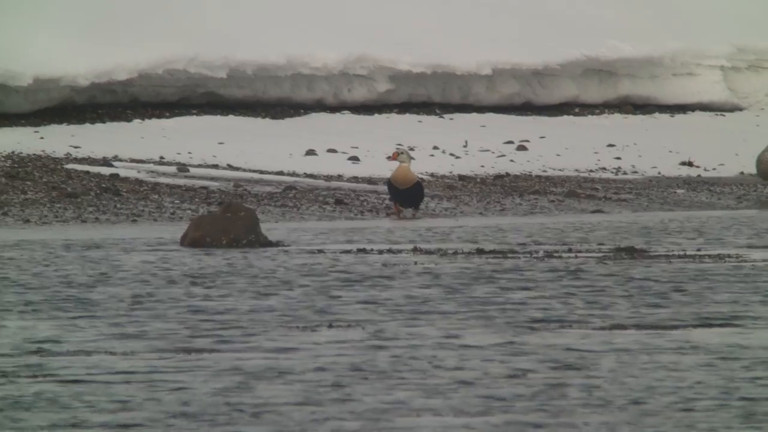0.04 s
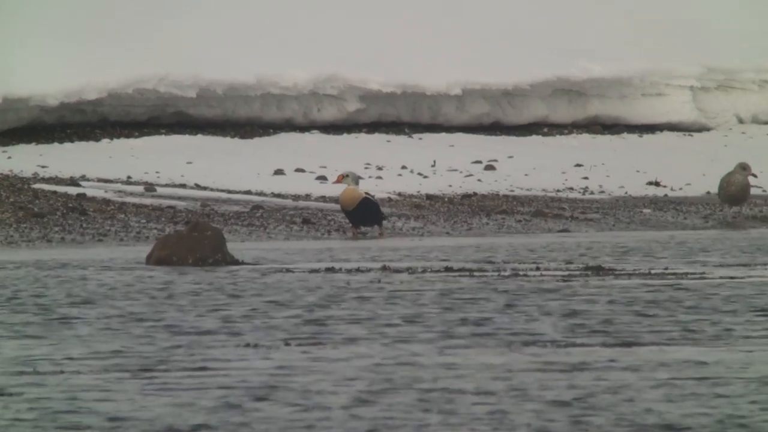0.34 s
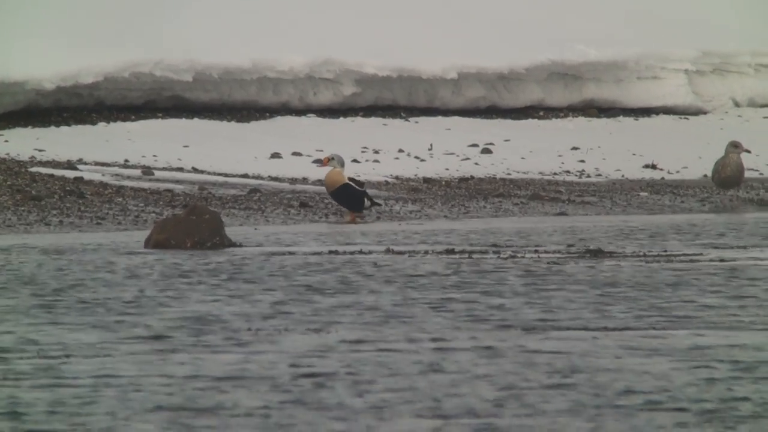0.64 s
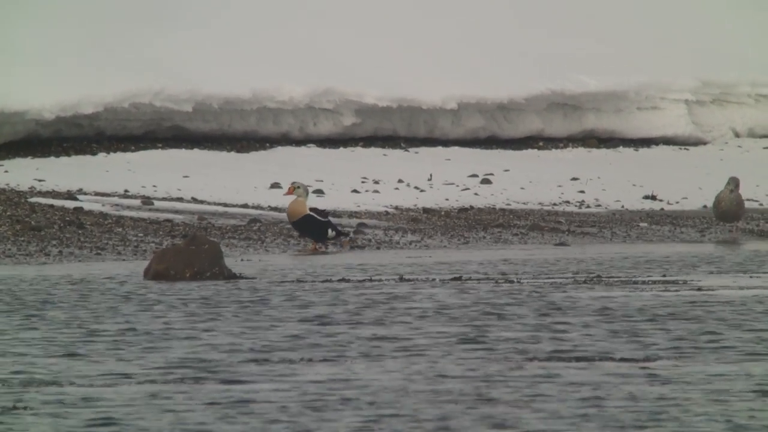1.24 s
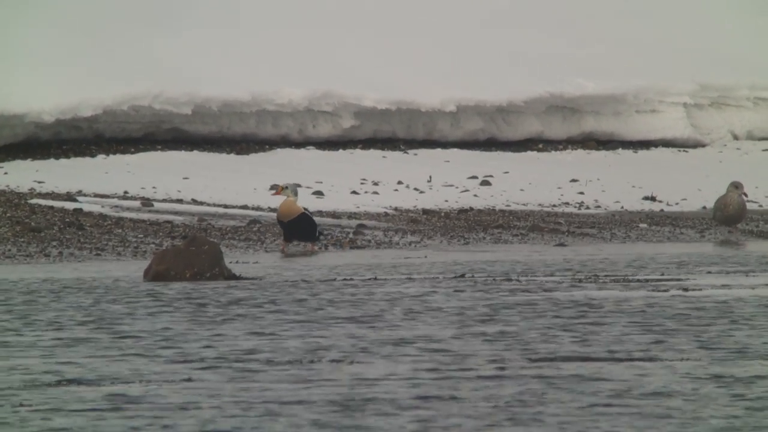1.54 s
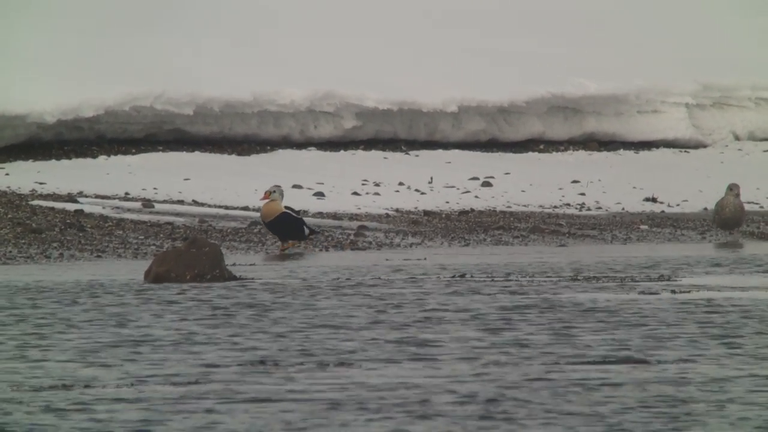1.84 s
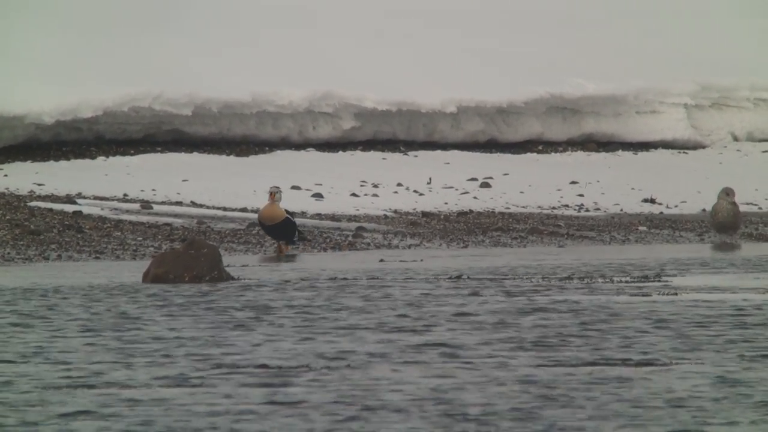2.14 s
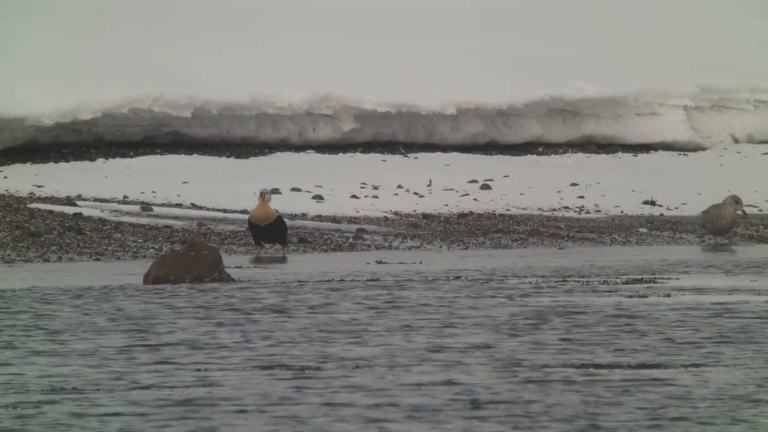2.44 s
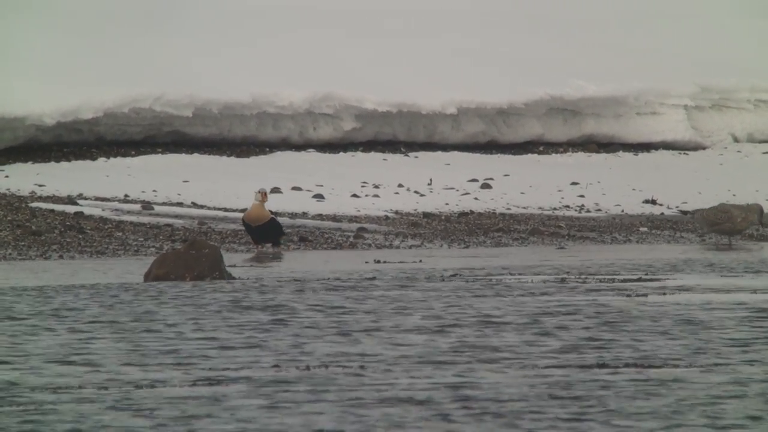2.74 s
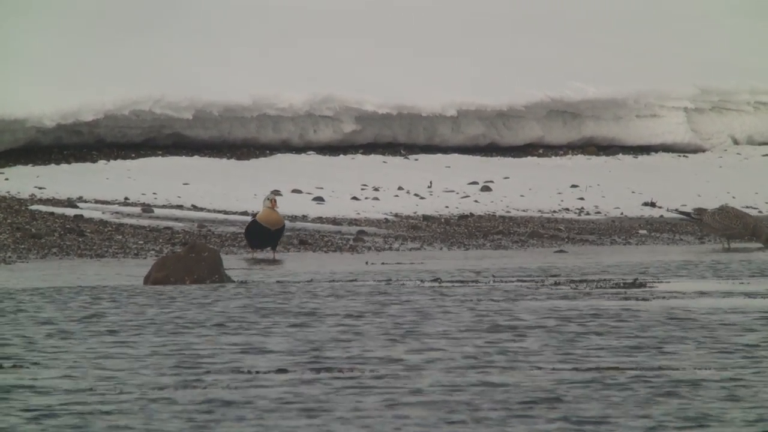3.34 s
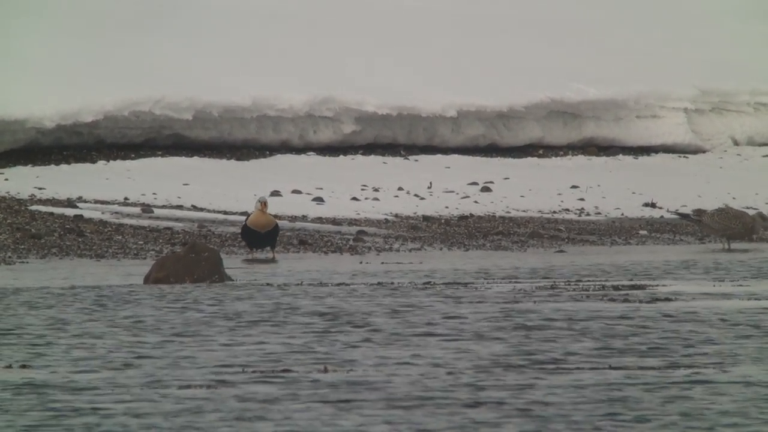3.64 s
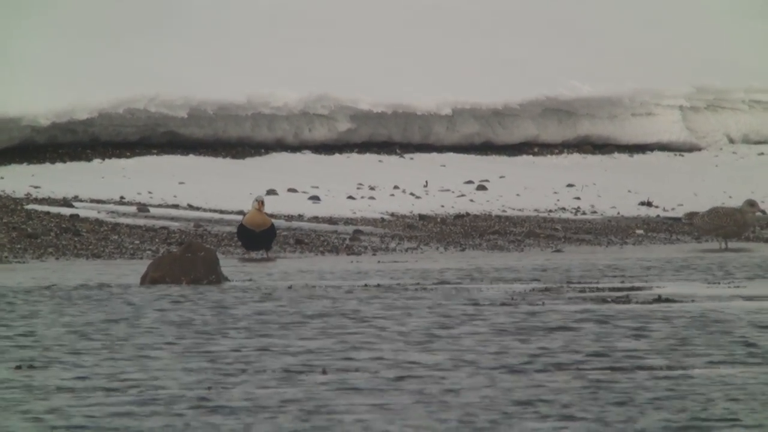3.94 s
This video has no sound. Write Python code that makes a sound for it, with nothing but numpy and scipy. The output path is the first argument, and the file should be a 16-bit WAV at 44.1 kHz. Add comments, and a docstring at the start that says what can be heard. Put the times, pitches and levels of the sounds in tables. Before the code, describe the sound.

Wind blows across the microphone at the water's edge, light at first, then in stronger, fluttering gusts over a low rumble. Far-off sea birds call softly near the start, and wavelets barely sound on the shingle.

```python
"""Wind buffets a microphone: a blustering body, a spitting flutter of small eddies, a low rumble.
A light breeze gives way to gusts after a second; the air drives eddies across the microphone's ports.
Behind it, on a pebbly, snowy shore, wavelets wash over shingle, with tiny ticks and one splash,
and open water murmurs. Distant sea birds whistle, one trills, and a snow bank echoes them."""
import sys
import numpy as np
from scipy import signal
from scipy.fft import rfft, irfft
from scipy.io import wavfile
from scipy.ndimage import uniform_filter1d

SR = 44100
rng = np.random.default_rng(int(sys.argv[2]) if len(sys.argv) > 2 else 0)


def digitize_waveform(pressure):
    """Quantize a signal to 16-bit integers and store it at the path in sys.argv[1].

    Rows of a 2-D input are taken as channels; values are limited to [-1, 1].
    """
    field = np.atleast_2d(pressure).T
    bounded = np.clip(field, -1, 1)
    quanta = np.round(bounded * 32767).astype(np.int16)
    wavfile.write(sys.argv[1], SR, quanta)


N = 176400
T = np.arange(N) / SR


def from_db(db):
    """Decibels to gain."""
    return 10 ** (np.asarray(db) / 20)


def unit_rms(x):
    """Scale to rms 1."""
    return x / np.sqrt(np.mean(x ** 2) + 1e-20)


def curves(rows):
    """Interpolate each column after time_s to every sample."""
    time_s, *columns = np.transpose(rows)
    return [np.interp(T, time_s, column) for column in columns]


def pan(left_over_right_db):
    """Left and right gains."""
    return from_db(np.array([[left_over_right_db / 2], [-left_over_right_db / 2]]))


def delayed(x, delay_s):
    """Fractional delay."""
    return np.interp(T - delay_s, T, x, left=0)


def drift(rate_hz):
    """Smooth random wander, rms 1."""
    hop, settle = 40, 2000
    pole = np.exp(-2 * np.pi * rate_hz * hop / SR)
    noise = rng.standard_normal(N // hop + settle + 2)
    slow = signal.lfilter([1], [1, -2 * pole, pole * pole], noise)[settle:]
    return np.interp(np.arange(N) / hop, np.arange(len(slow)), unit_rms(slow))


def coloured(x, spectrum):
    """Filter by (freq_hz, gain_db) rows, rolling off past both ends; rms 1."""
    hz, db = np.transpose(spectrum)
    bins_hz = np.fft.rfftfreq(2 * N, 1 / SR) + 1
    skirts = 1 / np.sqrt((1 + (hz[0] / 2 / bins_hz) ** 4) * (1 + (bins_hz / 2 / hz[-1]) ** 6))
    gain = from_db(np.interp(np.log(bins_hz), np.log(hz), db))
    return unit_rms(irfft(rfft(x, 2 * N) * skirts * gain)[..., :N])


def stereo_noise(side_db):
    """Mid/side white noise."""
    mid, side = rng.standard_normal((2, N))
    return mid + from_db(side_db) * side * np.array([[1], [-1]])


def clicks(per_s, spread_db):
    """Random impulses, mostly small, a few large; rms 1."""
    sizes = from_db(spread_db * np.minimum(rng.exponential(1, N), 4)) * rng.choice([-1, 1], N)
    return unit_rms(sizes * (rng.random(N) < per_s / SR))


def levelled(x, span_s):
    """Hold short-term stereo rms near 1."""
    size = int(span_s * SR)
    power = uniform_filter1d(uniform_filter1d(np.mean(x ** 2, axis=0), size), size)
    return x / np.sqrt(np.maximum(power, 0) + 1e-4)


def pulses(starts_s, levels_db, decay_s, attack_s=0.0012):
    """Summed envelopes: linear attack, exponential decay."""
    return sum(from_db(db) * np.clip((T - s) / attack_s, 0, 1) * np.exp(-np.abs(T - s) / decay_s)
               for s, db in zip(starts_s, levels_db))


# Open-water spectrum: freq_hz, gain_db
SEA_SPECTRUM = [(100, 10.5), (500, -2), (1700, 3), (2500, -9), (12000, -37)]

def sea(level_db=-56, slope_db_per_s=-2.5):
    """Far murmur of open water, slowly fading."""
    murmur = coloured(stereo_noise(side_db=-8), SEA_SPECTRUM)
    return murmur * from_db(level_db + slope_db_per_s * T + drift(2.4))


# Wavelet envelope: time_s, level_db
WAVELETS = [(0.1, -65.5), (0.86, -67.5), (1.13, -53), (1.23, -70), (1.48, -62.5), (1.86, -72.5),
            (1.96, -60.5), (2.04, -59.5), (2.17, -52), (2.38, -66), (2.75, -75.5), (3.23, -62),
            (3.32, -76.5), (3.87, -72.5), (4.0, -57)]
# Shingle spectrum: freq_hz, gain_db
SHINGLE_SPECTRUM = [(1500, 6.5), (3600, 2), (8000, -1.5), (11000, 2.5), (15500, 0)]

def wash(gain_db=5):
    """Wavelets run over shingle: hiss plus grit."""
    level_db, = curves(WAVELETS)
    grit = np.array([clicks(per_s=930, spread_db=12) for _ in range(2)])
    hiss = coloured(stereo_noise(side_db=0.5) + 0.36 * grit, SHINGLE_SPECTRUM)
    return hiss * from_db(level_db + gain_db + 2.2 * drift(21)) * pan(3)


# Splash spectrum: freq_hz, gain_db
SPLASH_SPECTRUM = [(1100, -18), (2100, -2), (4000, -22.5)]

def splash(centre_s=1.04, width_s=0.028, level_db=-42.5):
    """One brief splash at the water's edge."""
    envelope = from_db(level_db) * np.exp(-(2 * (T - centre_s) / width_s) ** 2)
    return coloured(stereo_noise(side_db=-4), SPLASH_SPECTRUM) * envelope


# Sharp ticks: start_s, level_db
TICK_EVENTS = [(0.092, -47), (0.2563, -40.5), (.3358, -38), (.8845, -43), (1.0292, -43), (2.4985, -41),
               (3.0192, -43)]

def ticks(gain_db=-4, decay_s=0.0013, bright_hz=12100):
    """Tiny bright noise bursts, left of centre."""
    hiss = coloured(stereo_noise(side_db=-1.5), [(bright_hz / 3, -12), (bright_hz, 0)])
    envelope = sum(from_db(db + gain_db) * (T >= s) * np.exp(-np.abs(T - s) / decay_s)
                   for s, db in TICK_EVENTS)
    return hiss * envelope * pan(5)


def whistle(start_s, length_s, first_hz, last_hz, level_db, waver, edge_s=0.015):
    """Near-pure bird note, bending ever faster to its last pitch."""
    on = (T >= start_s) & (T < start_s + length_s)
    t = T[on] - start_s
    pitch_hz = (first_hz + (last_hz - first_hz) * (t / length_s) ** 1.2) * (1 + waver[on])
    envelope = from_db(level_db) * np.clip(np.minimum(t, length_s - t) / edge_s, 0, 1)
    note = np.zeros(N)
    note[on] = np.sqrt(2) * envelope * np.sin(2 * np.pi * np.cumsum(pitch_hz) / SR)
    return note


def flock(calls_per_s=18, lowest_hz=1050, fall=0.11, level_db=-67.5, slope_db_per_s=-5.5):
    """Far flock: hoarse falling whistles at random times, ever fainter."""
    hoarseness = 0.018 * drift(120)
    calls = np.zeros(N)
    for when, stretch, octaves in rng.random((int(calls_per_s * N / SR), 3)):
        start_s, length_s = when * N / SR, 0.1 * (1 + stretch)
        pitch_hz = lowest_hz * 2 ** octaves
        call_db = level_db + slope_db_per_s * start_s
        calls += whistle(start_s, length_s, pitch_hz, pitch_hz * (1 - fall), call_db, hoarseness)
    return calls


# Trill contour: time_s, top_pitch_hz, level_db
TRILL_CONTOUR = [(.68, 1862, -49), (.75, 2052, -52.5), (.97, 2113, -48), (1.12, 2000, -52.5)]
# Rasp around the trill: freq_hz, gain_db
RASP_SPECTRUM = [(1100, -17), (1600, 0.5), (2000, 0.5), (3400, -24)]

def trill(chirps_per_s=32, chirp_s=0.061, sweep_depth=0.59, bend_s=0.017, rasp_db=-6.5):
    """Overlapping raspy chirps, each sweeping up and levelling off at the top pitch."""
    top_hz, level_db = curves(TRILL_CONTOUR)
    rasp = from_db(rasp_db) * coloured(rng.standard_normal(N), RASP_SPECTRUM)
    roughness = 1 + 0.014 * drift(240)
    chirps = np.zeros(N)
    for beat_s in np.arange(TRILL_CONTOUR[0][0], TRILL_CONTOUR[-1][0] - chirp_s / 2, 1 / chirps_per_s):
        start_s = beat_s + rng.normal(0, 0.00196)
        on = (T >= start_s) & (T < start_s + chirp_s)
        t = T[on] - start_s
        pitch_hz = top_hz[on] * roughness[on] * (1 - sweep_depth * np.exp(-t / bend_s))
        tone = np.sin(2 * np.pi * np.cumsum(pitch_hz) / SR)
        chirps[on] += np.sin(np.pi * t / chirp_s) * (tone + rasp[on])
    return chirps * from_db(level_db)


# Bird whistles: start_s, length_s, first_hz, last_hz, level_db
BIRD_NOTES = [(0.051, 0.1, 1753, 1740, -59.5), (0.063, 0.23, 2060, 1784, -63),
              (.17, 0.088, 1425, 1436, -61), (0.171, 0.14, 2300, 2130, -66), (0.155, 0.32, 1790, 1588, -65),
              (0.445, 0.13, 1404, 1410, -54.5), (.545, 0.055, 1370, 1190, -59.5),
              (.665, .09, 1490, 1630, -56), (.725, 0.23, 1725, 1686, -56), (0.729, 0.209, 2020, 2067, -55),
              (.92, 0.074, 1900, 1970, -51.5), (1.1, 0.31, 1845, 1860, -61),
              (2.485, 0.094, 2320, 2280, -70.5), (3.886, .13, 3630, 3390, -69.5)]
# Snow-bank echoes, left then right: delay_s, gain_db
BANK_ECHOES = [(.023, -13.5), (.041, -13)]

def birds(waver_depth=0.011):
    """Trill, whistles and flock, centred, reflected once per side by the snow bank."""
    calls = trill() + sum(whistle(*note, waver_depth * drift(125)) for note in BIRD_NOTES) + flock()
    return np.array([calls + from_db(db) * delayed(calls, delay_s) for delay_s, db in BANK_ECHOES])


# Rumble envelope: time_s, level_db
RUMBLE_LEVELS = [(0.05, -47), (0.17, -33), (1.12, -35), (1.25, -29.5), (2.03, -29), (2.14, -54),
                 (2.27, -34), (2.85, -39), (4.0, -36.5)]
# Rumble spectrum: freq_hz, gain_db
RUMBLE_SPECTRUM = [(20, -23), (35, -20), (55, -3.5), (85, -5), (115, -1.5), (170, -8.5), (300, -41)]

def rumble(gain_db=-2.5):
    """Low rumble of wind on the microphone."""
    level_db, = curves(RUMBLE_LEVELS)
    low = coloured(stereo_noise(side_db=-19.5), RUMBLE_SPECTRUM)
    return levelled(low, span_s=0.062) * from_db(level_db + gain_db)


# Small-eddy spectrum: freq_hz, gain_db
FLUTTER_SPECTRUM = [(250, -16), (450, 7), (650, 8), (1200, 3.5), (2000, -10.5), (2600, -24.5),
                    (6000, -44.5), (12000, -68.5)]

def flutter(envelope, common_share=0.16, noise_share=0.26):
    """Small eddies spit: dense clicks, each with a different strength at each port."""
    eddies = clicks(per_s=1200, spread_db=4.5) * (common_share + rng.standard_normal((2, N)))
    eddies += noise_share * stereo_noise(side_db=-0.5)
    return levelled(coloured(eddies, FLUTTER_SPECTRUM), span_s=0.017) * envelope * pan(-5.5)


# Large-eddy spectrum: freq_hz, gain_db
BLUSTER_SPECTRUM = [(60, -27), (100, -7.5), (140, -2), (220, -1), (320, -1.5), (430, -4), (560, -11.5),
                    (750, -22.5), (1200, -47.5), (2500, -77)]

def bluster(envelope, slack_db=-32.5, slack_cutoff_hz=304):
    """Large eddies make the wind's body; slack air sounds duller."""
    full = levelled(coloured(stereo_noise(side_db=-7.5), BLUSTER_SPECTRUM), span_s=0.018)
    dull = unit_rms(signal.sosfiltfilt(signal.butter(2, slack_cutoff_hz, fs=SR, output="sos"), full))
    briskness = envelope / (envelope + from_db(slack_db))
    return (briskness * full + (1 - briskness) * dull) * envelope * pan(-1.6)


# Opening breeze: time_s, bluster_db
BREEZE_LEVELS = [(.135, -47), (.155, -24), (.22, -32.5), (.25, -27), (.34, -26), (.4, -38), (.46, -35.5),
                 (.56, -46), (.6, -31.5), (.67, -38), (.702, -45), (.75, -27), (.784, -40.5), (.88, -29.5),
                 (.94, -40.5), (1.12, -40)]
# Long gusts: time_s, bluster_db, flutter_db
GUST_LEVELS = [(1.17, -36, -69), (1.255, -20, -41.5), (1.3, -47, -85), (1.384, -28, -42.5),
               (1.52, -20, -33.5), (1.66, -23.5, -45), (1.735, -26, -46), (1.79, -20.5, -37.5),
               (1.875, -20, -37), (1.895, -36, -61), (1.99, -31, -53), (2.005, -21, -33),
               (2.066, -20, -37.5), (2.098, -42, -65), (2.165, -42.5, -72), (2.195, -19.5, -37),
               (2.3, -23, -54), (2.346, -25.5, -45.5), (2.38, -40, -82), (2.41, -20.5, -43.5),
               (2.465, -29.5, -68), (2.585, -22, -39), (2.608, -45, -71), (2.63, -23.5, -41.5),
               (2.7, -28, -62), (2.735, -19, -43.5), (2.81, -22.5, -43), (2.83, -39.5, -67),
               (2.9, -20.5, -41.5), (2.96, -26.5, -61), (3.06, -21.5, -42), (3.275, -20.5, -36),
               (3.34, -19.5, -45), (3.41, -20.5, -35.5), (3.48, -21, -40.5), (3.59, -23.5, -37.5),
               (3.67, -23, -43.5), (3.81, -21.5, -45.5), (3.916, -20, -44.5), (3.938, -37, -52),
               (4.0, -34.5, -73)]
# Single buffets of air: start_s, slap_db, thump_db
AIR_BUFFETS = [(0.147, -45, -26), (.168, -27, -20.5), (.314, -49, -19.5), (0.46, -49, -27),
               (0.667, -50, -22.5), (0.818, -45, -23), (0.872, -38, -25), (1.144, -26.5, -18.5),
               (1.332, -39.5, -23), (1.37, -31.5, -18.5), (1.412, -42, -19.5), (1.512, -38, -15.5),
               (1.683, -29, -21), (1.97, -50, -21), (2.114, -48, -30), (2.258, -46, -27), (2.293, -27, -20),
               (2.365, -58, -22.5), (2.541, -33.5, -19), (2.586, -34, -25), (2.668, -36, -21.5),
               (2.769, -24.5, -28), (3.034, -28, -40), (3.21, -21.5, -35), (3.624, -24.5, -37),
               (3.815, -23, -29.5)]

def wind(bluster_gain_db=-0.5, flutter_gain_db=3, thump_gain_db=4, port_lag_s=0.00015):
    """Breeze, gusts and buffets drive eddies across the left port, then the right."""
    breeze_db, = curves(BREEZE_LEVELS)
    gust_db, gust_flutter_db = curves(GUST_LEVELS)
    gusting = T >= GUST_LEVELS[0][0]
    swing = np.clip(drift(90), -2, 1.7)
    bluster_db = np.where(gusting, gust_db, breeze_db) + bluster_gain_db + 1.7 * swing
    flutter_db = np.where(gusting, gust_flutter_db, breeze_db - 26) + flutter_gain_db
    flutter_db += 4.5 * (swing - 0.5)
    starts_s, slap_db, thump_db = np.transpose(AIR_BUFFETS)
    thumps = pulses(starts_s, thump_db + thump_gain_db, decay_s=0.0087)
    slaps = pulses(starts_s, slap_db, decay_s=0.0046)
    push = np.hypot(from_db(bluster_db), thumps)   # powers add
    spit = np.hypot(from_db(flutter_db), slaps)
    left, right = rumble() + bluster(push) + flutter(spit)
    return np.array([left, delayed(right, port_lag_s)])


def scene():
    """Wind in front, shore and birds behind."""
    return wind() + wash() + sea() + splash() + ticks() + birds()


# Fade-in, last gain held: time_s, gain_db
FADE_CURVE = [(.04, -41), (.06, -9.5), (.09, 1.5)]

def record(dry, knee=0.74, cutoff_hz=15800):
    """Soft clip, quick fade-in, steep low-pass."""
    fade_db, = curves(FADE_CURVE)
    rounded = dry / (1 + (dry / knee) ** 6) ** (1 / 6)
    lowpass = signal.ellip(12, 0.1, 80, cutoff_hz, fs=SR, output="sos")
    return signal.sosfilt(lowpass, rounded * from_db(fade_db))


dry = scene()
out = record(dry)
digitize_waveform(out)
```